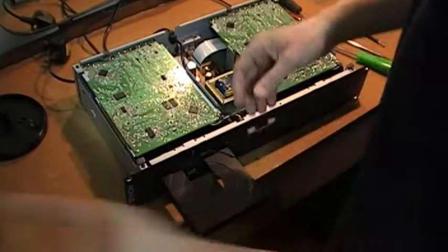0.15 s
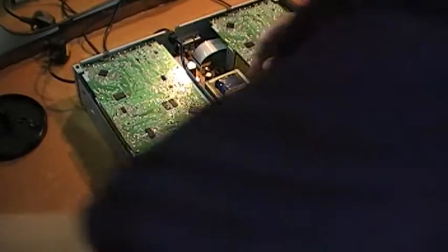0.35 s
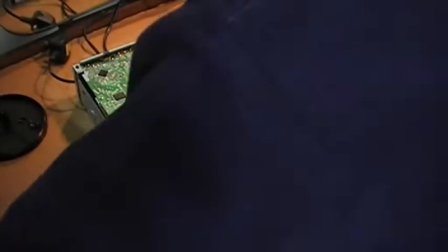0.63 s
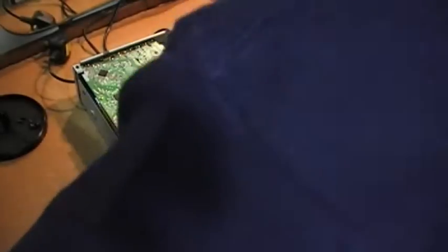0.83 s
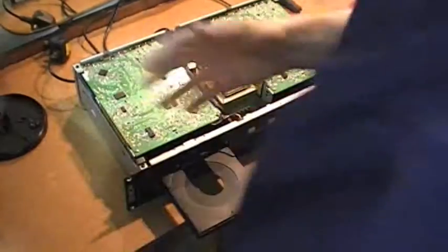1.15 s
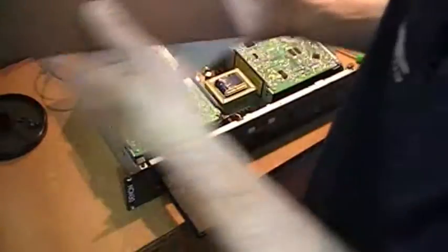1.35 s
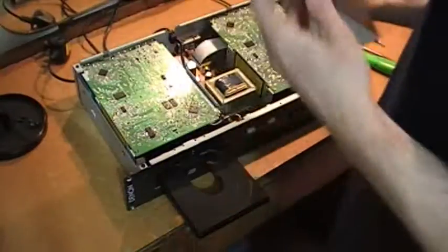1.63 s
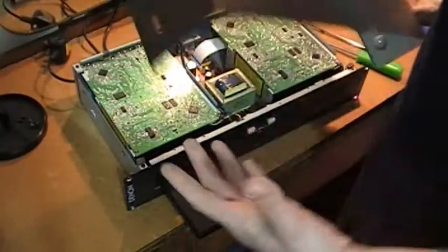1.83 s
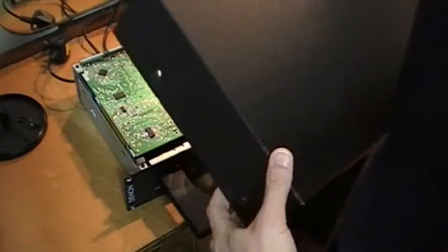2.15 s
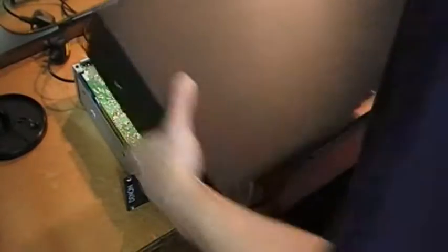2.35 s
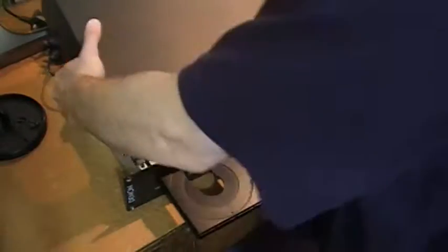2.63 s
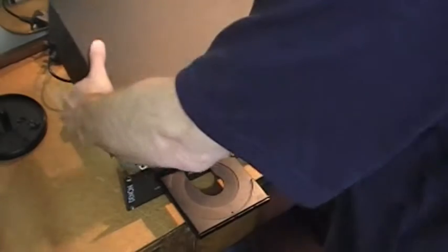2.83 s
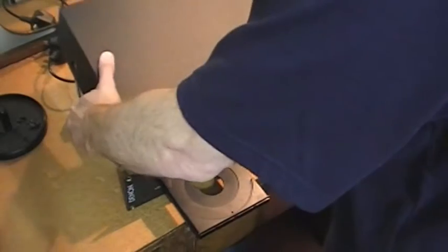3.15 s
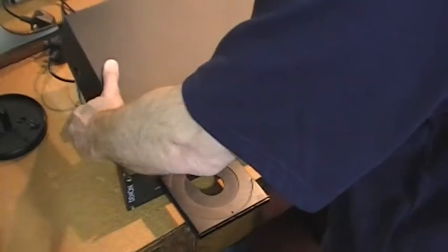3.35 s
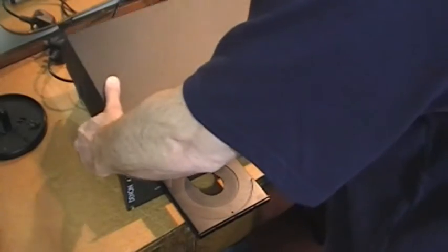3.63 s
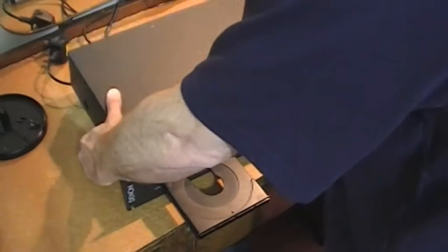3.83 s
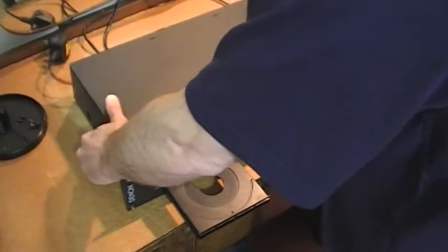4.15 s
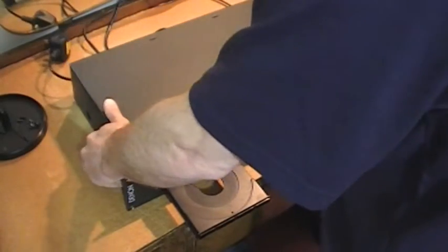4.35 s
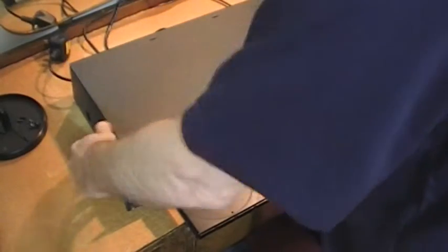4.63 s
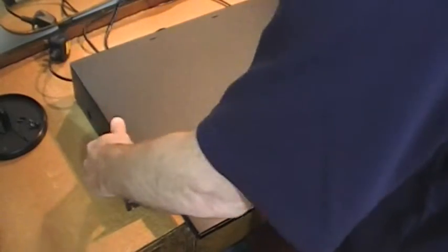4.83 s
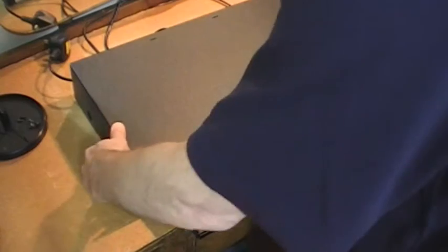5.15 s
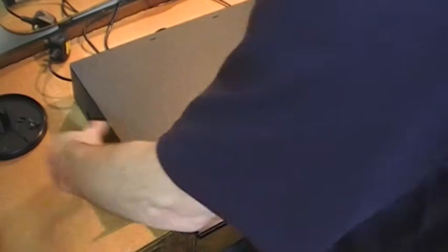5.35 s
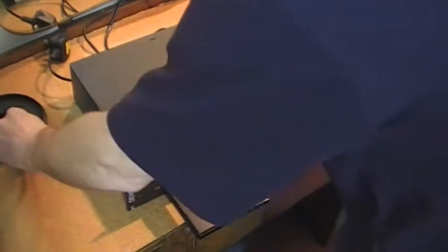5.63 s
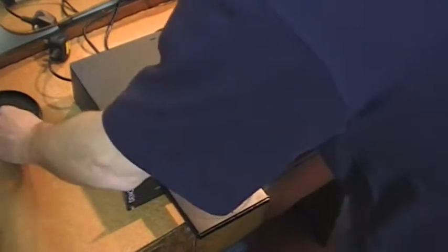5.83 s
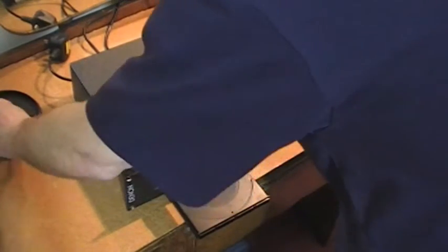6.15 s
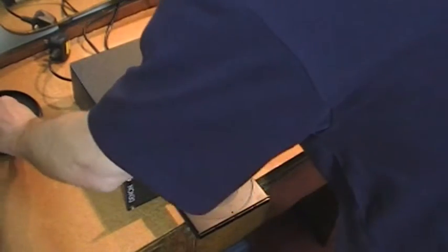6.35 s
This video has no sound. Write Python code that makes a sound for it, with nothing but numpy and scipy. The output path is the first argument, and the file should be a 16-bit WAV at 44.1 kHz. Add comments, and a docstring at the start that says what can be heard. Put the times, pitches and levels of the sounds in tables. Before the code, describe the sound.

Close on a bench in a small quiet workshop with faint hiss: a tool is set down with a woody knock, a metal cover is brushed, lifted with a couple of hollow clangs and softly scraped, then banged and slid onto a chassis in two hard rattling clusters. A few last knocks follow, then fingers stir loose screws in a dish.

```python
"""A faint hiss with two thin whines lies under a small quiet workshop, whose walls answer each touch briefly.
A tool is put down on a wooden bench; a resting sheet-metal cover is touched, then lifted and turned loose.
It is slid onto a chassis with harder clangs and scrapes; at the end fingers stir a dish of screws.
Every touch is a burst of tiny contacts that sets the touched thing ringing: a few clear modes sing,
crowded modes crack and rattle around them."""
import sys
import numpy as np
from scipy import signal
from scipy.fft import rfft, irfft
from scipy.io import wavfile

SR = 44100
rng = np.random.default_rng(int(sys.argv[2]) if len(sys.argv) > 2 else 0)


def to_linear_factor(level_db):
    """Convert decibel levels (scalar or array-like) to linear amplitude factors."""
    exponent = np.asarray(level_db, float) / 20
    return 10 ** exponent


def store_wav(level_fs):
    """Save 16-bit WAV to argv[1]."""
    pcm = np.round(np.clip(np.atleast_2d(level_fs), -1, 1) * 32767)
    wavfile.write(sys.argv[1], SR, pcm.T.astype(np.int16))


N = 286650

# Colour of the background hiss, relative: pitch_hz, level_db
HISS_COLOUR = [(15, -72.5), (25, -29), (70, -21.5), (97, -11.5), (170, -12.5), (270, -4.5), (416, -3.5),
               (591, -2.5), (988, -6), (1070, -6.5), (1560, -9), (3340, -16), (6560, -24), (8140, -14.5),
               (16000, -39.5)]
# How alike the hiss is at both ears: pitch_hz, likeness (-1 to 1)
HISS_LIKENESS = [(60, -0.12), (180, -0.65), (550, -0.66), (1650, -0.3), (4970, 0.15), (15000, 0.11)]
# Faint steady tones: pitch_hz, level_db (rms)
WHINES = [(1093, -76), (15622, -86.5)]
# Colour of the wall echoes: pitch_hz, echo_db
WALL_COLOUR = [(40, -4), (150, -28.5), (400, -13), (2000, -8.5), (5000, -8.5), (8500, -7), (15000, -8)]

# Frequency zones from thump, clang and rattle up to tick: low_hz, high_hz
ZONES_HZ = [(120, 700), (700, 2200), (2200, 5000), (5000, 15500)]
# The next two hold one value per zone, in the order tick, thump, clang, rattle.
# Time constant of each zone's swing up, longer for big slow shapes: rise_s
RISE_S = [.0002, .004, .001, .0004]
# Part of the crowded modes' energy that leaves at once, without ringing: share (0-1)
CRACK_SHARE = [0.79, 0.26, 0.49, 0.41]
# Gain per dB of slide brightness: hiss (dB/dB), thump (dB/dB), clang (dB/dB), rattle (dB/dB)
BRIGHT_LAW = (1.39, -0.4, 0.12, 0.93)
# The grip changes, and with it the mode that rings most: from_s, favoured_hz, freedom to ring (0-1)
FAVOURED = [(0, 390, .35), (.57, 460, .35), (1.2, 2210, .9), (1.8, 1900, 1), (1.9, 490, .7),
            (1.936, 1430, .7), (2.04, 1070, .8), (2.054, 1265, .9), (2.066, 460, .8), (2.43, 1070, .08),
            (2.47, 400, .5), (2.78, 280, .15), (2.95, 385, .3), (3.06, 490, .5), (3.29, 460, .5),
            (3.52, 560, .6), (3.58, 1450, .6), (3.685, 1986, .85), (3.705, 487, .7), (3.73, 1930, .95),
            (3.74, 520, .9), (3.85, 566, .65), (4.02, 277, .6), (4.155, 877, .8), (4.19, 487, .75),
            (4.247, 740, .6), (4.26, 520, .6), (4.37, 300, .6), (4.5, 740, .7), (4.73, 2944, .7),
            (4.744, 566, .9), (4.79, 277, .8), (5.02, 566, .7), (5.045, 740, .6), (5.052, 400, .8),
            (5.25, 1222, .5), (5.6, 902, .5), (5.68, 1410, .5), (5.89, 1057, .55), (6.1, 902, .75)]

# Knocks: start_s, clang_db, thump_over_clang_db, rattle_over_clang_db, chatter_t60_s
DISH_KNOCKS = [(5.6211, -42.5, 6.5, -3, 0.015), (5.689, -36, -33, -4, 0.03), (5.7758, -35, -28, -35, 0.013),
               (5.905, -43, -30, -17, 0.018), (5.9734, -45, -20, -26, 0.014),
               (6.1193, -36.5, -22, -17, 0.018), (6.1346, -38.5, -29, -14.5, 0.022),
               (6.1515, -38, -6, -16, 0.025), (6.2112, -42, -17, 2, 0.016), (6.2288, -41, -17, -1.5, 0.016),
               (6.2444, -40, -10, 1.3, 0.015), (6.388, -56, 9, 10, 0.026)]
TOOL_KNOCKS = [(0.0754, -72, -6, 16, 0.008), (0.083, -70.5, -6, 10.5, 0.008), (0.1, -69, -6, 11.5, 0.019),
               (0.5109, -31.5, 3.5, -31, 0.031), (0.5167, -46, 10, -14, 0.016),
               (0.5505, -39.5, 15, -21, 0.028), (0.5724, -38.5, 4.5, -36, 0.022),
               (0.578, -43, 10, -28, 0.014), (0.623, -49, 7.5, -14.5, 0.018), (0.6587, -53, -17, 3, 0.012),
               (0.6874, -61, -14, 6, 0.021)]
RESTING_KNOCKS = [(1.5282, -58.5, 4, 12, 0.02), (1.545, -67, -11, 12, 0.011), (1.731, -45, -24, -7, 0.0127),
                  (1.8386, -45.5, -18.5, -20, 0.023)]
LOOSE_KNOCKS = [(1.9323, -38.5, 9, -17, 0.026), (1.939, -35.5, -9.5, -5, 0.19),
                (2.0436, -27.5, -37, -14, 0.037), (2.0555, -24, -7, -18.5, 0.15),
                (2.0681, -31, -30, -8, 0.074), (2.4337, -41.5, -8.5, -21, 0.11),
                (2.787, -43.5, 4, -9, 0.081), (2.9634, -50, 4, -5.5, 0.045), (3.071, -50.5, 16, -10, 0.03),
                (3.3041, -51.5, 26, 1.5, 0.038), (3.5002, -47.5, 8.5, -10.5, 0.035),
                (3.5276, -46.5, 10.5, -10, 0.019), (3.5845, -36.5, -3, -14.5, 0.037)]
SEATED_KNOCKS = [(3.691, -23.5, -25, 4.5, 0.06), (3.7073, -29.5, 12.5, 3, 0.039),
                 (3.7174, -13.5, -12, -4, 0.028), (3.7364, -28, -1, -7, 0.16),
                 (3.8511, -32.5, 1, 0.5, 0.091), (3.8774, -32.5, 6, 3, 0.076), (4.1265, -36, 0, -0.1, 0.5),
                 (4.1609, -22.5, 3, 1.8, 0.12), (4.1929, -18, 11, -16, 0.019), (4.221, -23.5, 5, -1, 0.083),
                 (4.2365, -16, -0.5, 0, 0.03), (4.2486, -20, -2, -4, 0.054),
                 (4.268, -20.5, -3.5, -10, 0.024), (4.731, -44, 7, -2, 0.049), (4.7395, -27, -5, 1, 0.026),
                 (4.7452, -25.5, -10, -0.5, 0.054), (4.7544, -42.5, 15.5, 8, 0.13),
                 (4.8336, -25.5, 10, -3, 0.01), (5.029, -33, 11.5, 0, 0.016), (5.0475, -29.5, 4, 1.7, 0.03),
                 (5.0554, -33, 10, -6, 0.023), (5.2634, -55.5, -8.5, -12, 0.057)]

# Slides: peak_s, clang_db before brightness, swell_s per 20 dB, fade_s per 20 dB, brightness_db
# (swells and fades take at least 5 ms)
DISH_SLIDES = [(5.65, -76, .03, .11, -3), (5.705, -36, 0.032, 0.083, -0.9), (5.772, -37.5, .09, 0.13, -13),
               (5.95, -58.5, .08, 0.29, -3), (6.17, -52, 0.045, .04, -6), (6.225, -40, .04, 0.094, -3),
               (6.4, -58, 0.068, 0.13, 0.5), (6.49, -50.5, 0.098, .11, 0.1)]
TOOL_SLIDES = [(0.5, -51, 0.02, 0.21, 3.5), (0.573, -42.5, -0.25, 0.13, -7.5), (0.69, -61, 0.22, 0.18, 8)]
RESTING_SLIDES = [(1.3, -68, 0.17, .21, 3), (1.415, -56, 0.018, .09, 0.1), (1.479, -45, 0.084, 0.089, -0.5),
                  (1.621, -44.5, 0.04, 0.063, 5.5), (1.7, -55, 0.066, 0.12, -8)]
LOOSE_SLIDES = [(2.202, -55.5, 0.36, 0.13, 1), (2.291, -49, .05, 0.18, 7), (2.349, -51, 0.12, 0.039, 8.5),
                (2.5, -62.5, .06, 0.085, -17), (2.83, -59, 0.033, 0.04, -13), (3.0, -63.5, 0.03, 0.18, 1.5),
                (3.087, -48.5, 0.091, 0.035, -2.5), (3.226, -57.5, 0.13, 0.053, -4.9),
                (3.46, -66.5, .08, .08, -6.5), (3.528, -48, 0.035, .04, -6.5), (3.672, -58, 0.19, 0.09, -2)]
SEATED_SLIDES = [(3.904, -27.5, 0.058, 0.088, 2), (3.991, -33, .12, 0.076, -1),
                 (4.11, -45.5, 0.058, 0.041, -8.5), (4.301, -35.5, 0.022, 0.033, -8),
                 (4.345, -43.5, 0.033, 0.044, -14), (4.39, -50, .05, 0.14, -22), (4.55, -58, 0.12, 0.13, 7),
                 (4.8, -37, 0.028, 0.075, -6.5), (4.87, -49, 0.035, 0.061, -13),
                 (5.15, -59, 0.14, 0.096, -17), (5.28, -57.5, 0.032, 0.078, 7.5), (5.35, -68, .05, .11, 4)]

# Clear modes of each thing: pitch_hz, relative level_db, t60_s
DISH_MODES = [(902, 7.5, 0.11), (1057, 13.5, 0.037), (1280, -14, 0.057), (1400, 3, 0.064), (1692, 6, 0.058),
              (2055, 15, 0.061)]
BENCH_MODES = [(340, -3, .07), (390, 0, .09), (460, -1, .09), (590, -4, .07), (985, -6, .05),
               (1175, -3, .05), (2020, -5, .05)]
RESTING_MODES = [(1900, 0, .2), (2210, -2, .04), (2300, 0, .04), (2860, -3, .05)]
LOOSE_MODES = [(280, -6, .28), (385, -5, .25), (435, -3, .25), (490, -5, .28), (560, -10, .18),
               (694, -14, .2), (840, -16, .15), (1070, -9, .15), (1265, 0, .23), (1410, -7, .14),
               (1583, -11, .13), (1700, -14, .12), (2125, -15, .1), (2580, -6, .1), (2850, 0, .12),
               (3500, -6, .08), (3720, -3, .09), (3950, -4, .12)]
SEATED_MODES = [(200, -12, .2), (277, -1, .28), (320, -7, .22), (420, -5, .18), (487, 0, .24),
                (566, -5, .15), (640, -10, .12), (740, -4, .12), (877, 0, .18), (1061, -6, .13),
                (1222, -2, .13), (1265, -3, .17), (1373, -4, .12), (1496, -5, .13), (1862, -1, .22),
                (1986, -1, .24), (2089, -2, .2), (2267, -1, .16), (2393, -5, .13), (2568, -5, .12),
                (2785, -5, .12), (2944, -1, .14), (3300, -5, .1), (3730, -4, .12), (4068, -3, .11),
                (4253, -7, .1)]

# Crowded modes, rows tick, thump, clang, rattle:
# t60_s, share of clear modes in a knock (0-1), share of clear modes in a slide (0-1)
DISH_CROWD = [(0.032, 0.21, 0.042), (0.18, 0, 0.062), (0.031, 0.34, 0.22), (0.0334, 0.026, 0.058)]
TOOL_CROWD = [(0.026, 0.6, 0.42), (0.083, 0.56, 0), (0.033, 0.3, 0.04), (0.07, 0.5, 0.33)]
RESTING_CROWD = [(.03, 0, 0), (.1, 0, 0), (.06, .97, .06), (.05, .2, .4)]
LOOSE_CROWD = [(.04, 0.99, 0.14), (0.2, 1, 0.5), (0.098, 1, 0.08), (0.12, 0.8, 0.11)]
SEATED_CROWD = [(0.068, 0.74, 0.31), (.12, 0.8, 0.45), (0.16, 0.8, 0.15), (0.15, 0.61, 0.14)]

# How each thing is handled: tick_over_rattle_db, settling_under_knock_db, settling_t60_s,
# then for slides hiss_over_clang_db, thump_over_clang_db, rattle_over_clang_db
DISH_FEEL = (1.5, -36, 0.7, -1.5, -18.5, -3)
TOOL_FEEL = (7.5, -23.5, 0.33, -6, -5.5, -4.5)
RESTING_FEEL = (5, -21, 0.4, -3, -14.5, -1)
LOOSE_FEEL = (5, -21, 0.36, -0.9, -5.5, -2)
SEATED_FEEL = (0.37, -22.5, 0.38, -4, -6.5, -2.5)

# Colour of the crowded modes inside each zone, relative: pitch_hz, level_db
SCREWS_COLOUR = [(35, -83), (60, -39), (189, -2), (301, -13.5), (682, -8), (903, -5), (1410, -6),
                 (3850, -9.5), (8320, -11.5), (16000, -46.5)]   # screws in their dish
WOOD_COLOUR = [(35, -71), (60, -10), (281, -13.5), (427, 4.5), (621, -10.5), (715, -10.5), (862, -17),
               (8510, -22), (16000, -43)]   # tool on the bench
METAL_COLOUR = [(35, -81.5), (60, -59.5), (268, -17), (437, -16.5), (492, -10.5), (651, -14), (862, -11),
                (968, -15), (1220, -10.5), (1740, -16), (2900, -14), (5330, -21.5), (8510, -20),
                (13600, -40.5), (16000, -64.5)]   # the cover

HISS_DB = -63   # rms of the hiss averaged over both ears
ROOM_T60_S, WALL_GAP_S = 0.15, 0.0078
CONTACTS_PER_S, CONTACT_SPREAD_DB = 7000, 4.0
FIRST_CONTACT_DB = 6.5   # first contact of a knock over the contacts' rms
SPOTS, SPOT_S = 6, .004   # places that can be touched, time spent at each
TWIN_SPLIT, TWIN_DB = 0.0087, -15.5   # pitch offset as a fraction, level under the mode
SETTLE_TREBLE_DB = -6.5   # settling is duller than the knock
FAVOUR_DB, FAVOUR_OCTAVES = 12, .25   # lift of the favoured mode and its neighbours
THUMP_GRIP = 0.42   # share of the grip that reaches the big slow shapes
LOW_CUT_HZ, TOP_CUT_HZ = 196, 17600


def unit(x):
    """Scales each signal to energy one."""
    return x / np.sqrt(np.sum(x ** 2, axis=-1, keepdims=True) + 1e-30)


def at_hz(points, hz):
    """Reads a spectrum on a log-frequency axis."""
    pitch_hz, value = np.transpose(points)
    return np.interp(np.log(hz + 1), np.log(pitch_hz), value)


def tinted(points, size, channels=1):
    """Noise coloured by a spectrum in dB."""
    white = rfft(rng.standard_normal((channels, size)))
    return irfft(white * to_linear_factor(at_hz(points, np.fft.rfftfreq(size, 1 / SR))), size)


def dying(t60, size):
    """Exponential decay that falls 60 dB in t60 seconds, at least 4 ms."""
    return to_linear_factor(-60 * np.arange(size) / SR / max(t60, .004))


def pulse(points, size):
    """The shortest causal pulse with a given spectrum in dB (minimum phase)."""
    folded = irfft(np.log(to_linear_factor(at_hz(points, np.fft.rfftfreq(size, 1 / SR)))), size)
    folded[1:size // 2] *= 2
    folded[size // 2 + 1:] = 0
    return irfft(np.exp(rfft(folded)), size)[:size // 2]


def hiss():
    """Steady coloured noise, its likeness at both ears varying with pitch, and two thin sine whines."""
    mid, side = rfft(tinted(HISS_COLOUR, N, channels=2))
    alike = at_hz(HISS_LIKENESS, np.fft.rfftfreq(N, 1 / SR))
    both = irfft(np.sqrt(1 + alike) * mid + np.sqrt(1 - alike) * side * [[1], [-1]], N)
    both = both * to_linear_factor(HISS_DB) / np.std(both.mean(axis=0))
    t = np.arange(N) / SR
    return both + sum(np.sqrt(2) * to_linear_factor(db) * np.sin(2 * np.pi * hz * t) for hz, db in WHINES)


def workshop(x):
    """Walls answer after a short gap with dense dying echoes, different at each ear."""
    size, gap = SR // 2, round(WALL_GAP_S * SR)
    decay = dying(ROOM_T60_S, size)
    echoes = tinted(WALL_COLOUR, size, channels=2) * decay / np.sqrt(np.sum(decay ** 2))
    delayed = np.r_[np.zeros(gap), x]
    return np.array([signal.fftconvolve(delayed, echo)[:N] for echo in echoes])


def body(modes, crowd, colour):
    """Answers to one contact per zone: clear modes, and a crack with countless close modes at a few spots."""
    size, answers = SR // 3, []
    # folds and dents split every mode into a beating pair
    modes = modes + [(hz * (1 + TWIN_SPLIT), db + TWIN_DB, t60) for hz, db, t60 in modes]
    t, click = np.arange(size) / SR, pulse(colour, size=4096)
    zones = [ZONES_HZ[-1]] + ZONES_HZ[:-1]   # tick, thump, clang, rattle
    for (low, high), (crowd_t60, *_), crack in zip(zones, crowd, CRACK_SHARE):
        close = unit(rng.standard_normal((SPOTS, size)) * dying(crowd_t60, size))
        close *= np.sqrt(1 - crack)
        close[:, 0] = np.sqrt(crack)
        band = signal.butter(2, [low, high], "band", fs=SR, output="sos")
        close = signal.fftconvolve(close, signal.sosfilt(band, click)[None], axes=1)[:, :size]

        inside = [mode for mode in modes if low <= mode[0] < high]
        clear = [to_linear_factor(db) * np.sin(2 * np.pi * hz * t) * dying(t60, size) for hz, db, t60 in inside]
        clear = np.reshape(clear, (-1, size))
        answers.append((np.array([mode[0] for mode in inside]), clear, unit(close)))
    return answers


def force(knocks, slides, feel):
    """Contact strength per zone: knocks start at once, chatter away and settle; slides swell and fade."""
    # rows: free part of knocks, slides and settling, part of knocks kept from clear modes by grip or support
    out, t = np.zeros((3, len(RISE_S), N)), np.arange(N) / SR
    tick_db, settle_db, settle_t60, hiss_db, thump_db, rattle_db = feel
    grip_reach = np.array([[1], [THUMP_GRIP], [1], [1]])
    dull = to_linear_factor(settle_db + SETTLE_TREBLE_DB * np.array([[1], [0], [0], [1]]))
    size_max = SR // 3
    for start_s, clang_db, heavy_db, sharp_db, chatter_t60 in knocks:
        at = round(start_s * SR)
        size = min(N - at, size_max)
        freedom = [row[2] for row in FAVOURED if row[0] <= start_s][-1]
        free = 1 - (1 - freedom) * grip_reach
        levels = to_linear_factor(clang_db + np.array([sharp_db + tick_db, heavy_db, 0, sharp_db]))[:, None]
        chatter = levels * dying(chatter_t60, size)
        out[0, :, at:at + size] += np.sqrt(free) * chatter
        out[2, :, at:at + size] += np.sqrt(1 - free) * chatter
        out[1, :, at:at + size] += levels * dull * dying(settle_t60, size)
    for peak_s, clang_db, swell, fade, bright_db in slides:
        below = np.maximum((peak_s - t) / max(swell, .005), (t - peak_s) / max(fade, .005))
        stroke = to_linear_factor(clang_db - 20 * below)
        balance_db = np.array([hiss_db, thump_db, 0, rattle_db]) + bright_db * np.array(BRIGHT_LAW)
        out[1] += to_linear_factor(balance_db)[:, None] * stroke
    for zone, keep in enumerate(np.exp(-1 / (SR * np.array(RISE_S)))):
        # the tiny offset keeps the smoother clear of vanishing numbers
        out[:, zone] = signal.lfilter([1 - keep], [1, -keep], out[:, zone] + 1e-18)
    return out.swapaxes(0, 1)


def favoured_ring(pushed, start, hz, clear):
    """Each stretch of contacts rings the clear modes with those near the favoured pitch lifted."""
    out = np.zeros(len(pushed) + clear.shape[1] - 1)
    marks = np.clip([round(s * SR) - start for s, *_ in FAVOURED] + [N], 0, len(pushed))
    for a, b, (_, best_hz, _) in zip(marks, marks[1:], FAVOURED):
        if b > a and len(hz):
            octaves_off = np.log2(hz / best_hz)
            lift = to_linear_factor(FAVOUR_DB * np.exp(-(octaves_off / FAVOUR_OCTAVES) ** 2))
            out[a:b + clear.shape[1] - 1] += signal.fftconvolve(pushed[a:b], unit(lift @ clear))
    return out


def touched(knocks, slides, feel, modes, crowd, colour):
    """Uneven tiny contacts, scaled by the force, ring the thing; the spot that is touched keeps changing."""
    born = rng.random(N) < CONTACTS_PER_S / SR
    sizes = to_linear_factor(CONTACT_SPREAD_DB * np.minimum(rng.exponential(1, N), 4)) * rng.choice([-1, 1], N)
    contacts = unit(born * sizes) * np.sqrt(N)   # rms one
    contacts[[round(s * SR) + 8 for s, *_ in knocks]] = to_linear_factor(FIRST_CONTACT_DB)
    spot = rng.integers(0, SPOTS, N)[(np.arange(N) / SR / SPOT_S).astype(int)]

    # only the stretch in which the thing is handled
    start = round(max(0, min(knocks[0][0], slides[0][0] - 2 * slides[0][2])) * SR)
    stop = round(max(knocks[-1][0] + .3, slides[-1][0] + 2 * slides[-1][3]) * SR)
    out = np.zeros(N + SR)
    zones = zip(force(knocks, slides, feel), body(modes, crowd, colour), crowd)
    for pushes, (hz, clear, close), (_, knock_share, slide_share) in zones:
        shares = np.array([knock_share, slide_share, 0])
        into_clear = (np.sqrt(shares) @ pushes * contacts)[start:stop]
        into_close = (np.sqrt(1 - shares) @ pushes * contacts)[start:stop]
        rung = favoured_ring(into_clear, start, hz, clear)
        for place, answer in enumerate(close):
            rung += signal.oaconvolve(into_close * (spot[start:stop] == place), answer)
        out[start:start + len(rung)] += rung
    return out[:N]


def tool():
    """A tool put down knocks and slides on the bench, ringing short wooden modes."""
    return touched(TOOL_KNOCKS, TOOL_SLIDES, TOOL_FEEL, BENCH_MODES, TOOL_CROWD, WOOD_COLOUR)


def dish():
    """Stirring fingers make screws tick and slide, ringing their dish."""
    return touched(DISH_KNOCKS, DISH_SLIDES, DISH_FEEL, DISH_MODES, DISH_CROWD, SCREWS_COLOUR)


def cover():
    """Sheet metal rings with different modes while resting, held loose and seated on the chassis."""
    resting = touched(RESTING_KNOCKS, RESTING_SLIDES, RESTING_FEEL, RESTING_MODES, RESTING_CROWD, METAL_COLOUR)
    loose = touched(LOOSE_KNOCKS, LOOSE_SLIDES, LOOSE_FEEL, LOOSE_MODES, LOOSE_CROWD, METAL_COLOUR)
    seated = touched(SEATED_KNOCKS, SEATED_SLIDES, SEATED_FEEL, SEATED_MODES, SEATED_CROWD, METAL_COLOUR)
    return resting + loose + seated


def scene():
    """Everything on the bench, nearly straight ahead, with the walls' answer and the hiss."""
    bench = tool() + dish() + cover()
    # the microphone picks up neither the deep bass nor the very top of the touches
    bench = signal.sosfilt(signal.butter(4, LOW_CUT_HZ, "high", fs=SR, output="sos"), bench)
    bench = signal.sosfilt(signal.butter(4, TOP_CUT_HZ, fs=SR, output="sos"), bench)
    ears = to_linear_factor(np.array([[-.25], [.25]]))   # left, right in dB
    return bench * ears + workshop(bench) + hiss()


def top_cut(x):
    """Nothing passes above the cut-off."""
    return signal.sosfilt(signal.butter(12, 15900, fs=SR, output="sos"), x)


def record(dry):
    """Delivers the finished mix."""
    return top_cut(dry)


dry = scene()
out = record(dry)
store_wav(out)
```